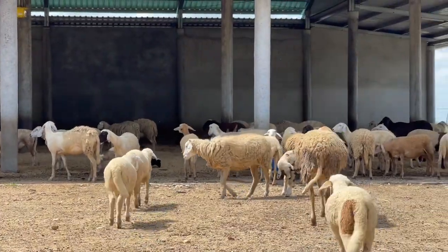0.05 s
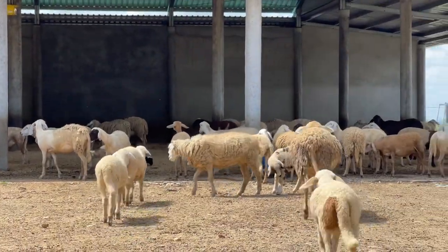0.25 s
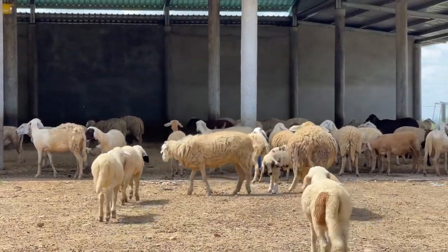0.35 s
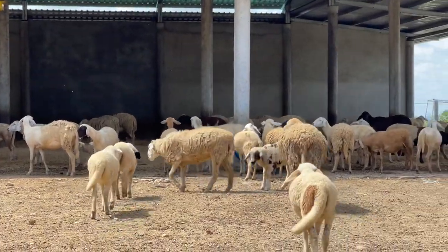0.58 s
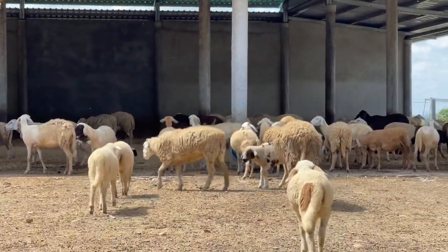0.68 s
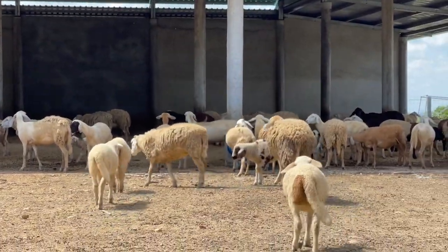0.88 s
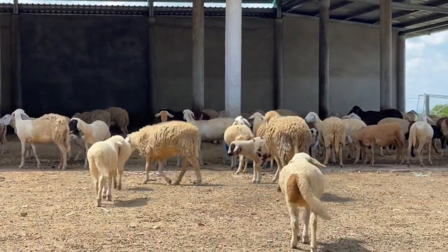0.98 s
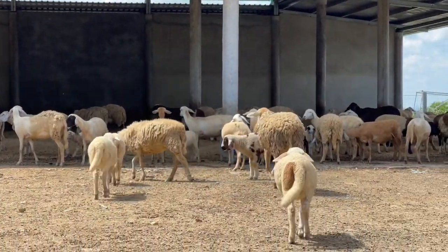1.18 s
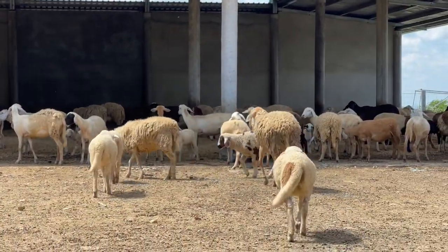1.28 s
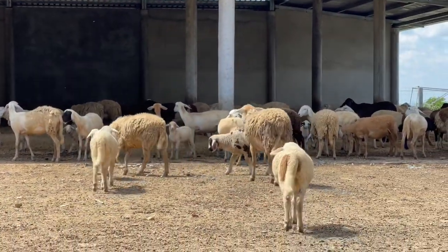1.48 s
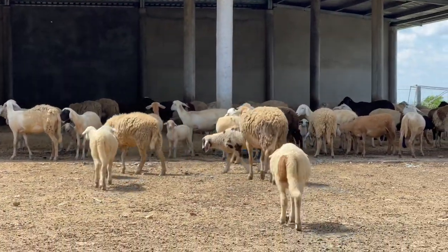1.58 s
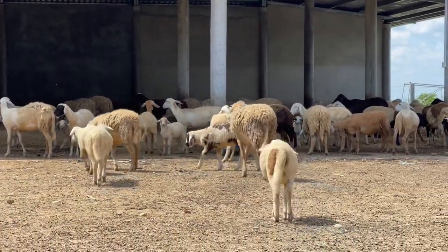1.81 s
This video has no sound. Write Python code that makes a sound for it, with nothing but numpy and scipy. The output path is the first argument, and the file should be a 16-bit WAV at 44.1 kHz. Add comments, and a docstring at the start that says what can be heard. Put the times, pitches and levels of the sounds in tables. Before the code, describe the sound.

A sheep close by hums through its nose, then gives one long low bleat from about 0.3 seconds, ending on a creak near 1.2. A second sheep, further inside an open barn, creaks into a hoarse, quavering call from 0.1 to 0.8. Both echo briefly. Faint distant whistles follow from 1.1 seconds, and hooves lightly scuff dry earth around 1.7. A steady rumble and hiss runs underneath.

```python
"""Over a steady rumble and hiss, a sheep close by hums through its nose.
A second sheep, further into an open barn, creaks into a hoarse, quavering call.
Meanwhile the near one opens its mouth for one long low bleat, which ends last, on a creak.
Both voices are pulses of the vocal folds shaped by the throat, and the barn rings briefly with them.
Then come faint distant whistles, and hooves scuff the dry yard."""
import sys
import numpy as np
from scipy import signal
from scipy.fft import rfft, irfft
from scipy.io import wavfile
from scipy.ndimage import uniform_filter1d

SR = 44100
rng = np.random.default_rng(int(sys.argv[2]) if len(sys.argv) > 2 else 0)


def to_wav(s):
    """Save 16-bit WAV."""
    ch = np.atleast_2d(s).T  # columns
    pcm = np.round(np.clip(ch, -1, 1) * 32767)  # PCM
    wavfile.write(sys.argv[1], SR, pcm.astype(np.int16))


N = 81585
T = np.arange(N) / SR
FREQS = np.fft.rfftfreq(N, 1 / SR)


def amp(db):
    """Turns decibels into a number to multiply by."""
    return 10 ** (np.asarray(db) / 20)


def unit(x):
    """Scales a signal to an average size (rms) of 1."""
    return x / np.sqrt(np.mean(x ** 2) + 1e-20)


def curve(rows, column=1):
    """One column of a table, joined by straight lines in time."""
    rows = np.array(rows)
    return np.interp(T, rows[:, 0], rows[:, column])


def read(points, hz):
    """Looks up a table by frequency, on a log scale."""
    f, value = np.transpose(points)
    return np.interp(np.log(hz + 1), np.log(f + 1), value)


def drift(hz):
    """A random wobble, up to about hz times a second."""
    return unit(irfft(rfft(rng.standard_normal(N)) / (1 + (FREQS / hz) ** 4), N))


def burst(start, length, hz, width, db):
    """Noise around one frequency that swells and fades."""
    swell = np.sin(np.pi * np.clip((T - start) / length, 0, 1))
    band = irfft(rfft(rng.standard_normal(N)) / (1 + (2 * (FREQS - hz) / width) ** 2), N)
    return amp(db) * swell * unit(band)


def colour(x, points):
    """Filters a sound to the tone colour in a table; the result has size 1."""
    log_gain = np.log(amp(read(points, abs(np.fft.fftfreq(8192, 1 / SR)))))
    response = np.exp(np.conj(signal.hilbert(log_gain)))  # rings after a pulse, never before
    taps = np.fft.ifft(response).real[:2048]
    return unit(signal.fftconvolve(x, taps)[:N])


def low_cut(x, hz):
    """Weakens everything below hz."""
    return signal.sosfilt(signal.butter(2, hz, "high", fs=SR, output="sos"), x)


def pan(x, db):
    """Makes the left side db louder than the right."""
    return np.array([x * amp(db / 2), x * amp(-db / 2)])


def air(level_db=-51.5, patch_db=2, side_db=-1.5):
    """Steady rumble and hiss with drifting louder and softer patches."""
    # background colour: f/Hz, relative level/dB
    spectrum = [(20, -40), (45, 0), (80, 7), (140, -2.5), (250, -1.5), (450, -9.5), (800, -18.5),
                (1500, -18.5), (2400, -15.5), (3300, -16.5), (5000, -14.5), (7500, -14.5), (9300, -14.5),
                (10700, -10), (11500, -19.5), (12300, -32)]
    hz, _, noise = signal.stft(rng.standard_normal((2, N)), SR, nperseg=1024, noverlap=768)
    patches = uniform_filter1d(rng.standard_normal(noise.shape[1:]), size=14, axis=0)
    patches = unit(uniform_filter1d(patches, size=10, axis=1))
    noise = noise * amp(read(spectrum, hz)[:, None] + patch_db * patches)
    mid, side = signal.istft(noise, SR, nperseg=1024, noverlap=768)[1][:, :N]
    side = side * amp(side_db)  # mid is what both ears share, side is what sets them apart
    return amp(level_db) * unit(np.array([mid + side, mid - side]))


def whistles():
    """Faint thin tones from far off."""
    # whistles: start/s, length/s, f/Hz, width/Hz, level/dB
    tones = [(1.137, 0.35, 3800, 90, -59.5), (1.09, 0.55, 2750, 140, -62.5), (1.654, 0.2, 2700, 37, -65.5)]
    return sum(burst(*row) for row in tones)


def hooves(width_hz=730):
    """Hooves make short dull scuffs on dry earth."""
    # scuffs: start/s, length/s, level/dB, f/Hz
    scuffs = [(1.639, 0.009, -55, 1310), (1.722, .02, -60, 976), (1.74, 0.061, -55.5, 1110)]
    return sum(burst(start, length, hz, width_hz, db) for start, length, db, hz in scuffs)


def barn(x, build_s=.018, bass_hz=276, width=.36):
    """Walls and roof give a blur of fading echoes; the open sides let the bass escape."""
    # how long the barn rings: f/Hz, time to fade by 60 dB/s
    ring_times = [(100, 0.36), (700, 0.41), (2200, 0.8), (4000, 1), (10000, 0.26)]
    hz, t, noise = signal.stft(rng.standard_normal((2, SR)), SR, nperseg=256)
    fade = amp(-60 * t / read(ring_times, hz)[:, None])
    tail = signal.istft(noise * fade, SR, nperseg=256)[1][:, :SR]
    tail = tail * np.clip(T[:SR] / build_s, 0, 1) ** 2
    tail = tail / np.linalg.norm(tail[0])
    mid, side = signal.fftconvolve(low_cut(x, bass_hz)[None], tail, axes=1)[:, :N]
    return np.array([mid + width * side, mid - width * side]) / np.hypot(1, width)


def folds(hz, rough, top_hz=5000):
    """The vocal folds give a pulse and a puff of noise each cycle; the pulses lack treble past top_hz."""
    cycles = np.cumsum(hz) / SR
    pulses = sum(np.cos(2 * np.pi * k * cycles) / (1 + (k * hz / top_hz) ** 6) for k in range(1, 64))
    puffs = (.14 + np.exp(-(cycles % 1) / .86)) * rng.standard_normal(N)
    return unit((1 - rough) * unit(pulses) + rough * unit(puffs))


def far_creaks(decay_s=.0088, click_gain=.36):
    """The far sheep's folds slip, with a click and a puff each time, before its voice catches."""
    # slips: t/s, level/dB
    slips = [(0.109, -46.5), (.126, -41.5), (.144, -35.5), (.166, -47), (.188, -43), (0.211, -37)]
    # throat colour, mouth barely open: f/Hz, relative level/dB
    throat = [(90, -35), (200, -18), (420, -13.5), (560, -4), (720, 5.5), (850, -9), (1100, -26),
              (1600, -16), (2100, -17), (2800, -28), (4000, -51), (11000, -37)]
    clicks, puffs = np.zeros(N), np.zeros(N)
    for start, db in slips:
        clicks[round(start * SR)] = amp(db) * np.sqrt(decay_s * SR / 2)
        puffs += amp(db) * (T >= start) * np.exp(-abs(T - start) / decay_s)
    drive = click_gain * clicks + puffs * rng.standard_normal(N)
    return colour(drive, throat) * np.std(drive)


def far_sheep(throb_width_s=.017, trough_db=-5.5, jitter=.035):
    """A hoarse, throbbing voice whose throat rings strongly at one note and faintly higher up."""
    # the call: t/s, pitch/Hz, level/dB
    call = [(.1, 135, -64), (.15, 148.2, -45), (.195, 152.3, -41), (.225, 156, -38.5), (.3, 196.2, -33),
            (.4, 199.8, -30.5), (.52, 199.4, -29.5), (.64, 181.6, -35.5), (.72, 183.2, -45),
            (.84, 191, -48)]
    # throbs of the quaver: t/s, strength/dB
    throbs = [(0.147, 3), (0.231, 10.5), (0.3, 2.5), (.356, 10.5), (0.417, -3), (.496, -15), (.567, -3),
              (.641, 12), (.688, 7), (0.74, -7)]
    # throat colour: f/Hz, relative level/dB
    throat = [(80, -11), (195, -0.5), (300, -12.5), (450, -5.5), (650, -2.5), (780, 5.5), (920, -16),
              (1150, -16), (1600, -13), (2100, -8.5), (2700, -17), (3030, -14), (3200, -19.5),
              (3500, -19.5), (4200, -30), (5500, -29), (7500, -26.5), (11000, -33)]
    # the throat's almost pure ring: t/s, f/Hz, level above the rasp before throbbing/dB
    ringing = [(.12, 690, -14), (.18, 735, -10), (.225, 783, -3), (.3, 787, 2.5), (.36, 782, -5.5),
               (.45, 785, -16), (.55, 765, -11), (.65, 752, 2), (.8, 745, -7)]
    peaks = sum(amp(db) * np.exp(-((T - s) / throb_width_s) ** 2) for s, db in throbs)
    throb = amp(trough_db) + peaks * (1 - amp(trough_db))
    pitch_hz = curve(call) * (1 + jitter * drift(81.5))
    rasp = colour(folds(pitch_hz, rough=.7), throat) * throb ** .22  # throbs less than the ring
    ring_hz = curve(ringing) * (1 + .007 * drift(51))
    ring = np.sqrt(2) * np.sin(2 * np.pi * np.cumsum(ring_hz) / SR)
    ring *= amp(curve(ringing, column=2) + 1.3 * drift(122)) * throb
    sounding = (T > call[0][0]) & (T < call[-1][0])
    overtone = burst(start=.22, length=.46, hz=3090, width=200, db=-51)
    return sounding * amp(curve(call, column=2)) * (rasp + ring) / np.sqrt(2) + overtone


def soften(x):
    """Each frequency leaves the throat at a slightly different time, which softens the pulses."""
    # lag in the throat: f/Hz, delay/s
    lag = [(100, 0.0023), (600, 0.0015), (1000, 0.0007), (1450, 0.000084), (1750, 0.0016), (2020, 0.0024),
           (2400, 0.00058), (4000, 0.00016), (11000, 0.00017)]
    return irfft(rfft(x) * np.exp(-2j * np.pi * np.cumsum(read(lag, FREQS)) * SR / N), N)


def near_hum(hz):
    """The near sheep's voice comes out through its nose."""
    # loudness of the hum: t/s, level/dB
    level = [(0, -56.5), (.06, -45), (.12, -50), (.2, -44.5), (.29, -41), (.315, -35), (.38, -39.5),
             (.48, -60), (1.13, -77), (1.165, -52), (1.195, -51), (1.25, -54), (1.3, -70)]
    # throat colour, mouth shut: f/Hz, relative level/dB
    shut = [(50, -25), (95, 1.5), (190, -3.5), (250, 1.5), (300, -12), (400, -19.5), (800, -24),
            (3000, -59)]
    return colour(soften(folds(hz, rough=.71)), shut) * amp(curve(level))


def near_bleat(hz, rough, quaver_hz=20.76, quaver_db=.94, flutter_db=.8, bright_hz=2010):
    """Quavering pulses pass through a mouth that opens wide, narrows and closes."""
    # mouth movement: t/s, shape (0 open, 1 narrowing, 2 closing)
    mouth = [(.33, 0.91), (.47, 0.53), (.58, 0), (.78, 0.13), (.85, 0.54), (.95, .9), (1.03, 1.16),
             (1.085, 1.91), (1.15, 2)]
    # throat colour for each shape: f/Hz, relative level/dB
    wide_open = [(60, -11), (142, -3), (285, -5), (427, -7.5), (575, 3), (720, 8), (865, -8), (1010, -7),
                 (1170, -10.5), (1300, -9), (1440, -8.5), (1590, -5.5), (1760, -31), (2020, -5),
                 (2160, -22.5), (2300, -14), (2700, -34), (3700, -17), (5000, -16), (11000, -54)]
    narrowing = [(60, -28), (138, -1), (280, -13), (415, -2), (555, 3), (695, -1.5), (835, 1.5),
                 (970, -9.5), (1110, -11), (1250, -11), (1405, 0.5), (1540, -7), (1700, -17), (1990, -7),
                 (2240, -14), (2700, -23.5), (3300, -32), (3800, -12), (5000, -37), (11000, -44)]
    closing = [(60, -15), (125, -2.5), (260, -6.5), (500, -1), (620, -3), (750, 5), (900, -10.5),
               (1120, -9.5), (1370, -16), (1780, -26.5), (2030, -11), (2300, -11), (2800, -22.5),
               (4000, -24), (11000, -25)]
    shape = curve(mouth)
    drive = folds(hz, rough, top_hz=np.interp(shape, [1, 2], [3000, 5000]))
    quaver = np.sin(2 * np.pi * quaver_hz * T)
    drive *= amp(flutter_db * drift(33) + quaver_db * quaver)
    # the quaver is deeper in one bright band, the throat's third resonance
    bright_band = signal.butter(2, bright_hz * np.exp([-.24, .24]), "band", fs=SR, output="sos")
    bright = signal.sosfiltfilt(bright_band, drive)
    extra_db = 1.5 * quaver + 2.5 * drift(42)
    drive = soften(drive + bright * (amp(extra_db) - 1))
    return sum(np.maximum(1 - abs(shape - k), 0) * colour(drive, throat)
               for k, throat in enumerate([wide_open, narrowing, closing]))


def near_sheep(jitter=.00406):
    """Hum and bleat share one pitch, shakier when the voice is rough; a rasp cuts the bleat off."""
    # the tune of the voice: t/s, pitch/Hz
    pitch = [(0, 91.37), (.27, 92.16), (.305, 123.7), (.354, 126.4), (.392, 134.6), (.45, 140.5),
             (.636, 145.3), (.724, 146.1), (.914, 141.6), (1.034, 138.2), (1.06, 135.3), (1.084, 125.4),
             (1.135, 123.7), (1.16, 110.7), (1.19, 99.7), (1.25, 89.8)]
    # effort of the bleat: t/s, level/dB, roughness (0 to 1)
    effort = [(.27, -95, 0.48), (.34, -39.5, 0.55), (.42, -30, 0.12), (.55, -30, 0.21), (.72, -29.5, 0.02),
              (.88, -31, 0.06), (1.03, -33, 0), (1.09, -33, 0.29), (1.143, -30.5, 0.42), (1.165, -41.5, .6),
              (1.21, -69.5, 0.39)]
    rough = curve(effort, column=2)
    hz = curve(pitch) * (1 + jitter * (1 + 5 * rough) * drift(58.5))
    fade_in = np.clip((T - .2) / .09, 0, 1)
    bleat = near_bleat(hz, rough) * amp(curve(effort)) * fade_in
    hum = near_hum(hz)
    rasp = burst(start=1.128, length=.04, hz=2840, width=2600, db=-47.5)
    return hum + bleat + rasp


def scene(near_echo_db=-6.5, far_echo_db=-4.5):
    """Both sheep, the barn behind them, and the yard."""
    # where the near sheep is heard: t/s, left over right/dB
    near_balance = [(.4, 2.6), (.8, 1), (1.1, 0.6)]
    near = near_sheep()
    far = far_sheep() + far_creaks()
    voices = pan(near, curve(near_balance)) + pan(far, db=-.5)
    echoes = barn(near * amp(near_echo_db) + far * amp(far_echo_db))
    return voices + echoes + hooves() + whistles() + air()


def record(dry, lowest_hz=40, highest_hz=12200):
    """Two close microphones: nearly alike in the treble, out of step at the top, extremes cut off."""
    # stereo width: f/Hz, side gain/dB
    width = [(100, -12.5), (1200, 5), (2000, -2), (2400, -6), (4000, -6), (5500, -54), (12000, -30)]
    # how far the left leads the right: f/Hz, phase/rad
    lead = [(0, -0.5), (860, 0.3857), (1890, 0.18), (2300, 0), (3270, 0.7), (5200, 0), (8800, 0),
            (9300, -1.5), (10250, -3), (11600, -6.5), (12000, 9.5)]
    mid = rfft(dry[0] + dry[1]) / 2
    side = rfft(dry[0] - dry[1]) / 2 * amp(read(width, FREQS))
    turn = np.exp(.5j * read(lead, FREQS))
    pair = np.array([irfft((mid + side) * turn, N), irfft((mid - side) / turn, N)])
    treble_cut = signal.firwin(401, highest_hz, window=("kaiser", 7), fs=SR)
    return signal.oaconvolve(low_cut(pair, lowest_hz), treble_cut[None], "same")


dry = scene()
out = record(dry)
to_wav(out)
```